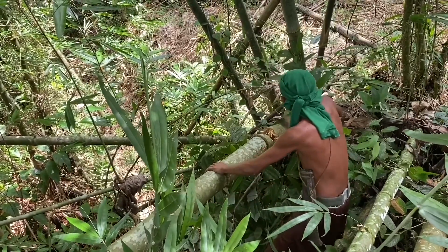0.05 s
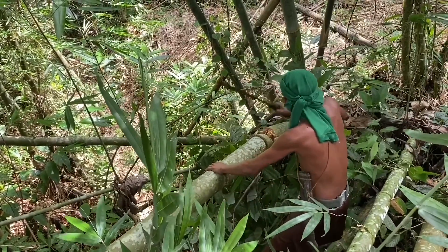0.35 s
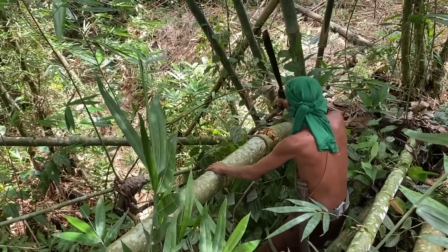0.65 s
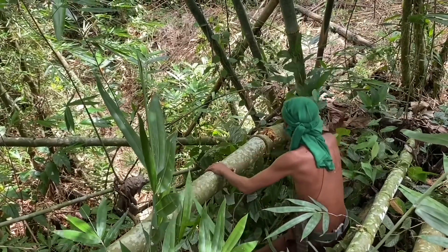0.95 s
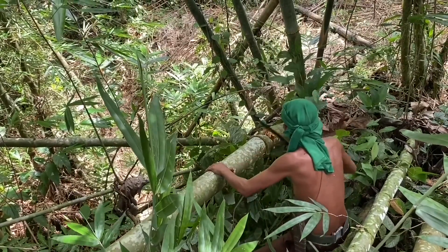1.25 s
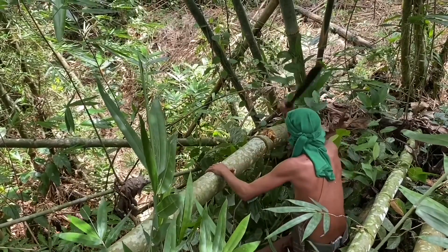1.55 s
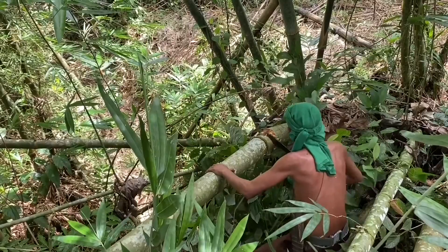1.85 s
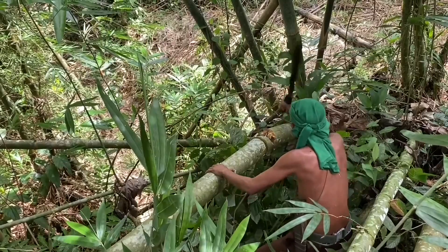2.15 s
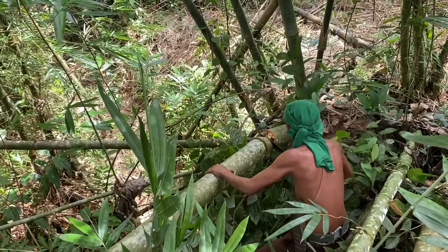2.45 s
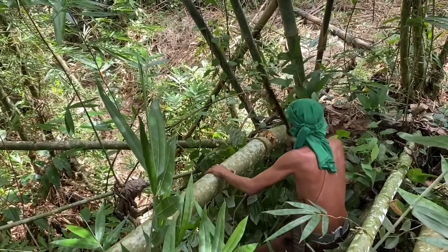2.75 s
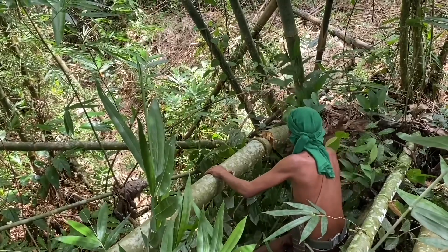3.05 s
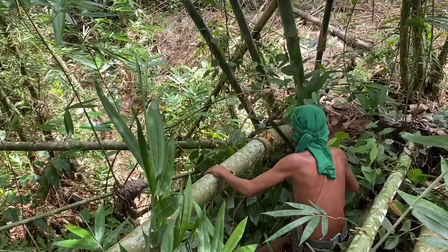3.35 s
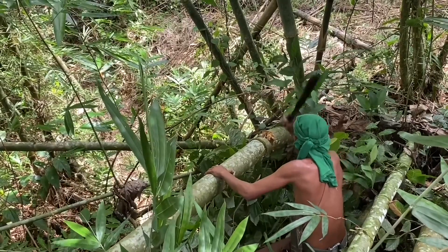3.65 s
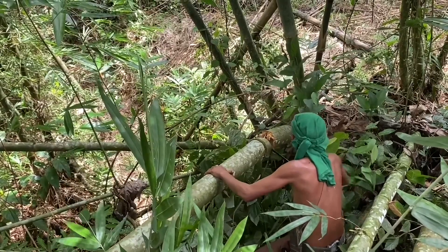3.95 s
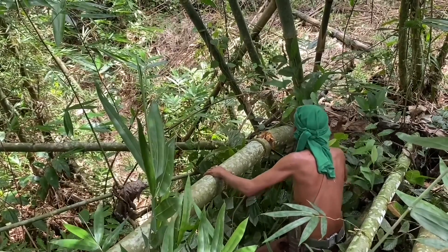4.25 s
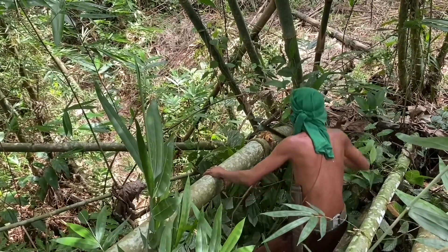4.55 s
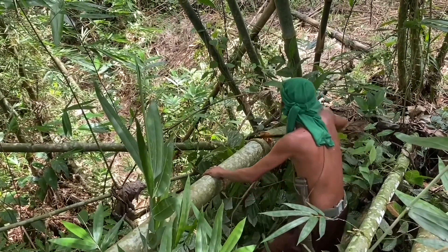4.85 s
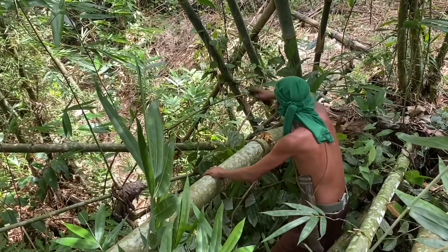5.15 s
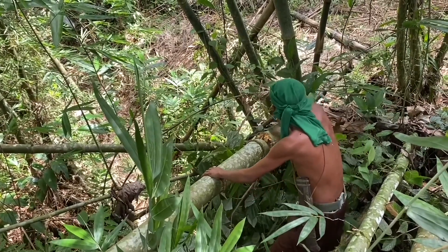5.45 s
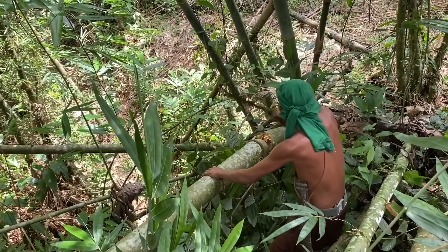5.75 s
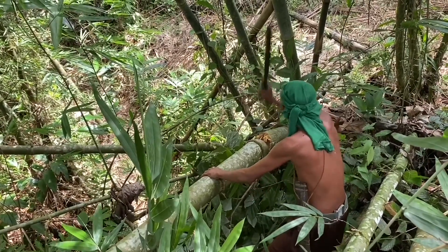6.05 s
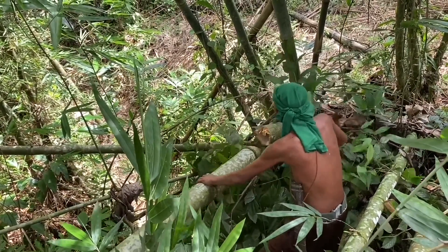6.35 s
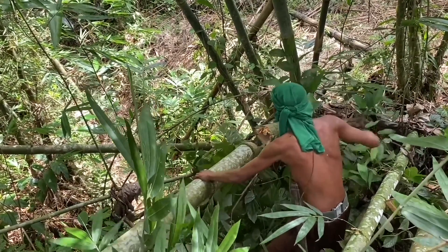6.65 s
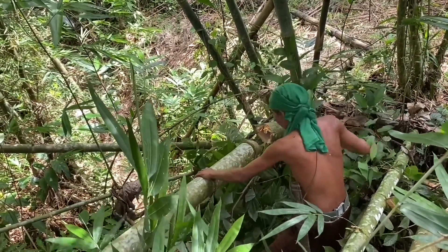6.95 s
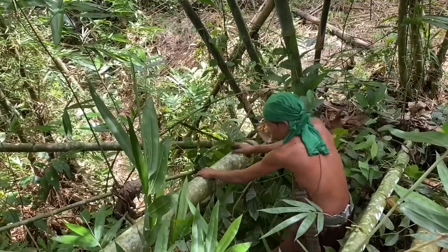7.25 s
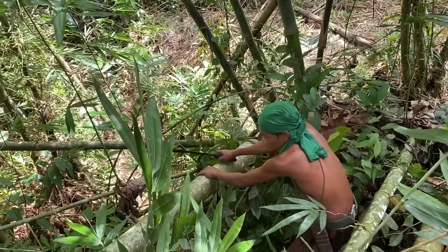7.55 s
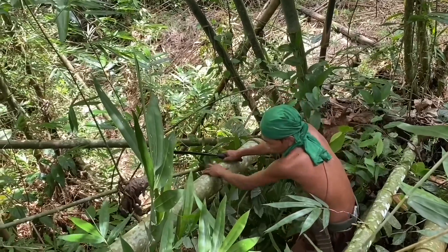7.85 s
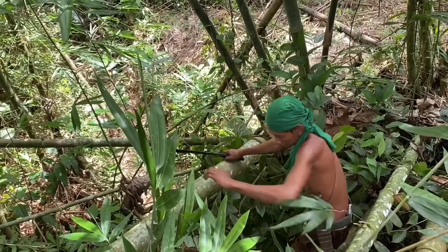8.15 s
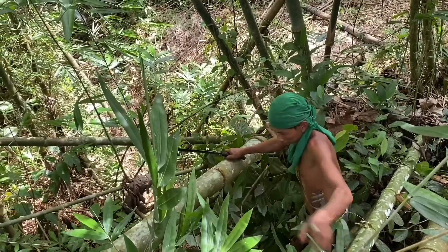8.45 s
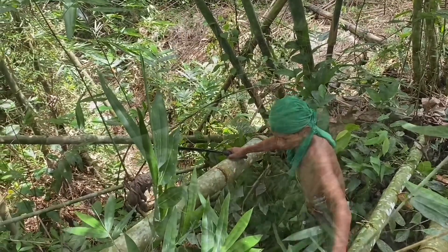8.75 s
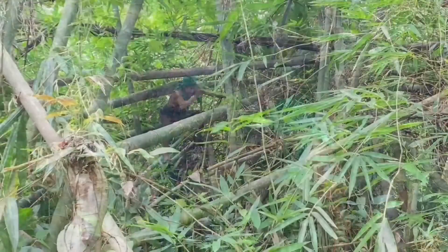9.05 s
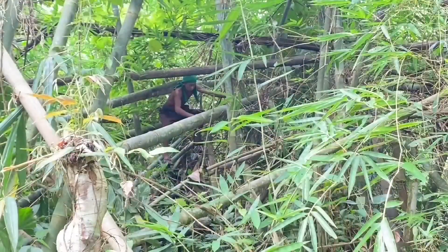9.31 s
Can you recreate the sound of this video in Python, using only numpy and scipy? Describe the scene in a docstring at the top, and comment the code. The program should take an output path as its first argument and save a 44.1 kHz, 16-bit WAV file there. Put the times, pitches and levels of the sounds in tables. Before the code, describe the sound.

Close to a stereo microphone in a bamboo grove, a machete chops a fallen pole about once a second. Each stroke is a crunchy, hollow knock with a slight steel ping. Chips tick into dry leaves, the wedged blade creaks midway, and one swing swishes through foliage. After a pause with faint bird calls, a final blow rings longer on another pole. Insects drone quietly over a low rumble.

```python
"""Chopping green bamboo in a grove

Close to the stereo microphone a machete bites a fallen culm about once a second; some seconds later a second,
longer-ringing one is struck. Fibres crunch, the hollow knocks, the steel pings, and the stems scatter each blow
into a short wash. Chips tick into the litter, the wedged blade creaks, one swing swishes through leaves.
Further off, insects drone and birds call over a low rumble."""
import sys
import numpy as np
from scipy import signal
from scipy.fft import rfft, irfft, next_fast_len
from scipy.io import wavfile
from scipy.ndimage import map_coordinates

SR = 44100
rng = np.random.default_rng(int(sys.argv[2]) if len(sys.argv) > 2 else 0)


def master(y):
    """Save y as 16-bit WAV."""
    cut = np.clip(np.atleast_2d(y).T, -1, 1)
    pcm = np.round(cut * 32767)  # scale
    wavfile.write(sys.argv[1], SR, pcm.astype(np.int16))


N = 418068

# reverberation among the stems: f/Hz, t60/s
GROVE_DECAY = [(100, 1), (300, 0.75), (900, 0.82), (2500, 0.11), (6000, 0.98), (14000, 0.38)]
# insect song: f/Hz, level/dB
INSECT_SPECTRUM = [(2800, -45), (3300, -17.5), (3700, -3.5), (4000, -4.5), (4300, -1), (4550, -10.5),
                   (4900, -18), (6300, -26.5), (7500, -18), (9000, -24.5), (15000, -35.5)]
# low rumble: f/Hz, level/dB
RUMBLE_SPECTRUM = [(20, -33.5), (45, -16), (80, -1.5), (140, 1.5), (200, -14), (320, -14.5), (600, -35.5),
                   (1200, -74.5)]
# its slow swell: t/s, level/dB
RUMBLE_SWELL = [(0, -78.5), (3, -75), (4.3, -69.5), (7.5, -73), (9.1, -73.5)]
# soft air and rustle: f/Hz, level/dB
AIR_SPECTRUM = [(150, -1.5), (400, -1), (900, -4), (2000, -5), (3500, -11), (9000, -20.5)]
# blade contacts: t/s, bite/s, thump/dB, shudder/dB, hollow/dB, knock/dB, crack/dB, sizzle/dB, steel/dB,
# hollow/Hz, knock/Hz, upper/Hz, ping/Hz
BLOWS = [(0.1107, 0.017, -36, -50.5, -32.5, -31.5, -36, -53, -46.5, 954, 1164, 1233, 10300),
         (1.0323, 0.017, -31, -48.5, -35, -35.5, -36.5, -42.5, -67, 408.7, 844, 1444, 4000),
         (1.661, .0088, -48.5, -59.5, -37.5, -34.5, -35, -51, -63.5, 610.8, 1140, 1800, 4000),
         (2.345, 0.0068, -49.5, -55.5, -39, -32.5, -37.5, -45, -52.5, 512.8, 1600, 1166, 5200),
         (3.043, 0.0084, -47.5, -55, -39.5, -37, -35, -38.5, -56.5, 763, 1404, 1694, 10300),
         (3.7565, 0.017, -48.5, -52.5, -34, -33, -37.5, -53, -64.5, 534.3, 1338, 1700, 4000),
         (4.872, 0.0024, -63.5, -70.5, -47, -47, -58, -68, -69, 884, 1056, 1170, 10300),
         (4.88, 0.0025, -57.5, -72.5, -49, -46, -61.5, -71.5, -70.5, 700, 1117, 1190, 10300),
         (5.472, 0.0044, -50, -68.5, -49, -33, -38, -57.5, -65.5, 800, 1936, 2765, 4000),
         (5.483, 0.013, -44.5, -55, -31.5, -38, -44.5, -58, -72, 670.5, 926, 1203, 4000),
         (6.165, 0.0062, -31, -54, -31.5, -33.5, -36.5, -53, -62.5, 640, 927, 1525, 4000),
         (9.179, 0.018, -54, -54.5, -40, -39, -41, -57, -79, 445, 1317, 2725, 2500)]
# hollow, knock, crack, splinter and sizzle ranges: low/Hz, high/Hz, left-right difference/ratio
WOOD_RANGES = [(320, 900, .3), (900, 2300, .55), (2300, 6000, .65), (6000, 11500, .85), (13000, 15600, .7)]
# snapping fibres: f/Hz, level/dB
FIBRE_SPECTRUM = [(120, -27.5), (200, 5.5), (353, -12.5), (647, -11.5), (851, -10), (1910, -10.5),
                  (2860, -20), (4200, -21.5), (5520, -25.5), (6400, -28), (8270, -30), (10300, -29.5),
                  (12200, -37), (14300, -14), (16000, -42)]
# culm wall: f/Hz, width/Hz, level/dB
WALL_MODES = [(642, 95, -3), (953, 45, -0.5), (1164, 77, -1), (1425, 15, -0.5), (1593, 35, -4),
              (1712, 22, -1), (1934, 71, -6.5), (2400, 7.2, -4), (3360, 47, -7.5), (3720, 60, -7),
              (3910, 66, -8), (4343, 50, -4), (4370, 44, -5)]
# steel blade: f/Hz, level/dB, t60/s
BLADE_MODES = [(2420, -9, .16), (4150, -5, .065), (5200, -3, .09), (9150, -9.5, 0.23), (10170, -1.5, .26),
               (10280, -2, .26), (14300, -7, .1)]
# the louder chips and twigs: t/s, level/dB, dull share/dB, bright share/dB, f/Hz
CHIP_FALLS = [(.284, -63, -15, -7.5, 2370), (.474, -73.5, -1.5, -22, 1940), (.872, -72, -24, -17, 2160),
              (1.376, -68.5, -7, 4, 2400), (1.467, -71, -0.5, -18, 2220), (1.538, -71.5, 1, -9, 793),
              (2.018, -70, 2, -16, 1170), (2.159, -66.5, -4.5, -13, 2030), (2.209, -71.5, -20.5, -6, 2030),
              (2.532, -59, -16, -14, 1063), (3.213, -63, -23, -30, 2057), (3.449, -78, -4.5, -20, 1030),
              (3.621, -70, -9.5, -7, 1370), (4.058, -67, -36, -15, 797), (6.276, -59.5, -25, -13, 2200),
              (6.529, -62, -14, -4.5, 3070), (6.856, -73.5, -20, -18, 2990), (6.971, -68, -28, -17, 1010),
              (7.016, -70, 2.5, -18, 1110), (7.275, -63.5, -7.5, -11.5, 1003),
              (7.505, -69, -4.5, -18, 1303), (7.74, -74, -18.5, -18, 2250),
              (8.229, -72.5, -27.5, -1.5, 3480)]
# the wedged blade slipping: t/s, hold/s, level/dB, slip rate/Hz
BLADE_SLIPS = [(4.186, 0.059, -32.5, 68), (4.357, 0.014, -37.5, 60)]
# wall around the cut: f/Hz, level/dB, t60/s
CUT_MODES = [(334, -4, 0.023), (615, 0, 0.042), (1150, -7, 0.0079), (1523, -2.5, 0.031), (1900, -6, 0.012)]
# the blade's swish through leaves, then the crackle after it: t/s, attack/s, hold/s, t60/s, level/dB
LEAF_BURSTS = [(6.122, .01, 0.043, 0.25, -46.5), (6.17, 0.024, 0.2, 2.02, -59)]
# colour of both: f/Hz, level/dB
LEAF_SPECTRUM = [(300, 1.5), (900, 5.5), (2500, 0.5), (6000, -2), (10000, -8), (15000, -8.5)]
# one held call, like a rooster's: t/s, f/Hz
CROW_MELODY = [(7.58, 938), (7.8, 867), (8.0, 924), (8.5, 821)]
# a small bird's rising chirps: t/s, top/Hz, level/dB
BIRD_CHIRPS = [(7.785, 6950, -70), (8.0, 6950, -69.5), (8.23, 7000, -72.5), (8.475, 6900, -73),
               (8.705, 6800, -76)]
# second culm: f/Hz, level/dB, t60/s
SECOND_CULM_MODES = [(355, -4.5, 0.43), (403, 4.5, 0.12), (460, 4.5, 0.12), (792, 8, 0.1), (958, -3, 0.2),
                     (1500, -17, 0.29), (1640, -11, 0.5), (2396, -17, 0.28), (2600, -16, 0.58),
                     (2750, -16, 0.17)]


def amp(db):
    return 10 ** (np.asarray(db) / 20)


def unit(x):
    return x / np.sqrt(np.mean(x ** 2) + 1e-20)


def along(points, hz):
    """Read (f/Hz, value) points on a log axis."""
    f, v = np.transpose(points)
    return np.interp(np.log(hz + 1), np.log(f + 1), v)


def curve(points):
    """Read (t/s, value) points at every sample."""
    return np.interp(np.arange(N) / SR, *np.transpose(points))


def wobble(rate):
    """A smooth random curve, rate knots a second."""
    return map_coordinates(rng.standard_normal(int(N * rate / SR) + 4), [np.arange(N) * rate / SR])


def filtered(x, response):
    """x through a complex frequency response."""
    n = x.shape[-1]
    m = next_fast_len(n + 8192)
    return irfft(rfft(x, m) * response(np.fft.rfftfreq(m, 1 / SR)), m)[..., :n]


def resonance(f, centre, width):
    """Causal response of one mode."""
    return 1j * f * width / (centre ** 2 - f ** 2 + 1j * f * width)


def wall(f, modes):
    """Response of a bamboo wall: modes of alternating sign."""
    return sum((-1) ** k * amp(db) * resonance(f, hz, width) for k, (hz, width, db) in enumerate(modes))


def band(x, lo, hi, order=2):
    return signal.lfilter(*signal.butter(order, [lo, hi], "band", fs=SR), x)


def fade(t, t60):
    return np.exp(-np.log(1000) * t / t60)


def envelope(s, attack, hold, t60):
    """A linear rise from time s, a hold and an exponential release."""
    t = np.arange(N) / SR - s
    return np.clip(t / attack, 0, 1) * fade(np.clip(t - attack - hold, 0, 3 * t60), t60)


def struck(x, db):
    """Scale x so that its first 40 ms have the given rms level."""
    return amp(db) * x / np.sqrt(np.mean(x[:SR // 25] ** 2) + 1e-20)


def ring(modes, t, scatter_db):
    """Free decay of modes, each at a slightly new strength."""
    return sum(amp(db + scatter_db * rng.standard_normal()) * fade(t, t60) * np.sin(2 * np.pi * hz * t)
               for hz, db, t60 in modes)


def add(track, s, x):
    """Mix x into the track from time s."""
    i = round(s * SR)
    track[..., i:i + x.shape[-1]] += x[..., :N - i]


def spread(pair, width):
    """Left and right from a mid-side pair."""
    return np.array([pair[0] + width * pair[1], pair[0] - width * pair[1]]) / np.hypot(1, width)


def rush(spectrum, width):
    """Stereo noise of rms 1."""
    return spread(unit(filtered(rng.standard_normal((2, N)), lambda f: amp(along(spectrum, f)))), width)


def grove(x, near_t60, near_db, width):
    """Close stems scatter a quick wash, the far ones a faint long tail."""
    hz, t, noise = signal.stft(rng.standard_normal((2, 3 * SR // 4)), SR, nperseg=256)
    decay = fade(t, along(GROVE_DECAY, hz)[:, None]) + amp(near_db) * fade(t, near_t60)
    tail = signal.istft(noise * decay * (1 - np.exp(-t / .012)), SR, nperseg=256)[1]
    return signal.fftconvolve(x[None], spread(tail, width) / np.linalg.norm(tail[0]), axes=1)


def insects(t, start_db=-64, wane_db_per_s=.3141):
    """A narrow band of song all round the microphone, slowly waning."""
    return amp(start_db - wane_db_per_s * t + .66 * wobble(25)) * rush(INSECT_SPECTRUM, width=1.5)


def rumble():
    """A low, unevenly swelling rumble near the centre."""
    return amp(curve(RUMBLE_SWELL) + 1.5 * wobble(6)) * rush(RUMBLE_SPECTRUM, width=.17)


def leaf_stir(t60=3.1):
    """Strength of the rustle: leaves settle at the start, after each blow and as the pole is handled."""
    shakes = [amp(crack_db - 31.5) * envelope(s, attack=.048, hold=0, t60=t60)
              for s, crack_db in np.array(BLOWS)[:, [0, 6]]]
    handling = amp(-76) * envelope(6.35, attack=.15, hold=.45, t60=5.1)
    settling = amp(-79.5) * fade(np.arange(N) / SR, t60)
    return np.linalg.norm(shakes + [handling, settling], axis=0)


def rustle(stir, air_db=-85, grain_db=2.5):
    """Stirred leaves add a grainy hiss to the still air."""
    grain = unit(amp(grain_db * wobble(140)))
    return np.hypot(amp(air_db), stir * grain) * rush(AIR_SPECTRUM, width=.27)


def ambience(stir, duck_s=3.24, duck_length_s=.412):
    """The background; the recorder briefly turns it down, most in the insects' high band."""
    t = np.arange(N) / SR
    duck_db = -11.5 * np.clip(np.minimum(t - duck_s, duck_s + duck_length_s - t) / .046, 0, 1)
    bed = amp(duck_db) * insects(t) + amp(.38 * duck_db) * (rumble() + rustle(stir))
    return bed * amp([[-1.3], [1.3]])  # louder on the right


def fibre_snaps(t, bite):
    """Fibres snap in a dense run while the edge sinks in, heard through the culm wall."""
    force = (1 - np.exp(-t / .0004)) / (1 + (t / bite) ** 6) + amp(-16) * fade(t, .09)
    run = force * rng.standard_normal(len(t)) * amp(.81 * rng.standard_normal(len(t)))
    return filtered(run, lambda f: amp(along(FIBRE_SPECTRUM, f)) * (.6 + amp(-1.5) * wall(f, WALL_MODES)))


def voiced(x, levels):
    """Split x into the wood's five ranges, each at its level for this blow."""
    return np.array([struck(band(x, lo, hi, order=3), db) for (lo, hi, _), db in zip(WOOD_RANGES, levels)])


def wall_knock(t, hz, bite, t60):
    """A wall mode builds up during the bite and is quickly damped by the wet wood."""
    drift = np.cumsum(rng.standard_normal(len(t))) * .032
    return (1 - np.exp(-2 * t / bite)) * fade(t, t60) * np.sin(2 * np.pi * hz * t + drift)


def blade_ping(t, ping_hz, octaves=.43):
    """The spot struck on the edge favours the steel's modes near ping_hz."""
    modes = [(hz, db - 6 * (np.log2(hz / ping_hz) / octaves) ** 2, t60) for hz, db, t60 in BLADE_MODES]
    return ring(modes, t, scatter_db=2.5)


def pole_shudder(t):
    """The pole shakes on the ground."""
    ground = band(band(rng.standard_normal(len(t)), 63, 175), 40, 320)
    return ground * (1 - np.exp(-t / .0042)) * fade(t, t60=.4)


def chamber_thump(t, rest_hz=182.5, swell_s=.0052):
    """Air in the culm swells and dies within a few cycles, sagging in pitch as the blade stops."""
    phase = 2 * np.pi * np.cumsum(rest_hz * (1 + .5 * np.exp(-t / .0105))) / SR
    overtone = amp(-5) * fade(t, .09) * np.sin(2 * phase)
    return (t / swell_s) ** 2 * np.exp(-t / swell_s) * (np.sin(phase) + overtone)


def chops(crack_hz=3800, splinter_db=-9.5):
    """Each blow, close up: fibres, wall, blade, pole and chamber, then the wash from the stems."""
    out, t = np.zeros((2, N)), np.arange(SR // 3) / SR
    widths, early = np.array(WOOD_RANGES)[:, 2], t[:SR // 8]
    for (s, bite, thump_db, shudder_db, hollow_db, knock_db, crack_db, sizzle_db, steel_db,
         hollow_hz, knock_hz, upper_hz, ping_hz) in BLOWS:
        levels = [hollow_db, knock_db, crack_db, crack_db + splinter_db, sizzle_db]
        # the spot struck decides which wall modes speak
        spot = lambda f: (1 + resonance(f, hollow_hz, 130) + amp(.5) * resonance(f, knock_hz, 220)
                          + amp(2.5) * resonance(f, upper_hz, 270)
                          + amp(9.5) * resonance(f, crack_hz, 550))
        crunch = voiced(filtered(fibre_snaps(t, bite), spot), levels).sum(axis=0)
        knocks = struck(wall_knock(t, hollow_hz, bite, t60=.048), hollow_db - 4.5)
        knocks += struck(wall_knock(t, knock_hz, bite, t60=.031), knock_db - 3)
        knocks += struck(wall_knock(t, upper_hz, bite, t60=.046), knock_db - 8.5)
        ping = struck(blade_ping(t, ping_hz), steel_db)
        shudder = struck(pole_shudder(t), shudder_db)
        thump = struck(chamber_thump(t), thump_db)
        mid = crunch + knocks + ping + thump + shudder
        # the nearest stems reflect differently to each side, most of all in the treble
        side = widths @ voiced(fibre_snaps(t, bite), levels)
        add(out, s, np.array([mid + side, mid - side]))
        # thin stems throw back little of the hollow note; each direction gets its own crack
        body = (amp(-7.5) * thump + amp(-11.5) * knocks)[:len(early)]
        wash_db = -1.5 if s == BLOWS[-1][0] else -9.5  # more from the second culm
        for direction in range(2):
            crack = amp([-1, -1.5, -.7, 4.5, 1.5]) @ voiced(fibre_snaps(early, bite), levels)
            add(out, s, amp(wash_db) * grove(crack + body, near_t60=.1, near_db=24.5, width=.7))
    return out


def tick(db, dull_db, bright_db, hz):
    """A dry tap: one short resonance, a dull knock and a bright edge."""
    t = np.arange(SR // 16) / SR
    touch = rng.standard_normal(len(t)) * fade(t, .042) * (1 - np.exp(-t / .0004))
    body = filtered(band(touch, 700, 4200), lambda f: .35 + resonance(f, hz, 300))
    dull = struck(band(touch, 190, 1200), db + dull_db)
    edge = struck(band(touch, 6100, 16000), db + bright_db)
    return struck(body, db) + dull + edge


def chips(stir, strays_per_s=10):
    """Chips and twigs land in the litter; faint stray ticks are louder while the leaves are astir."""
    out = np.zeros(N)
    for s, *tap in CHIP_FALLS:
        add(out, s, tick(*tap))
    count = int(strays_per_s * N / SR)
    stir_db = 20 * np.log10(stir / stir.mean() + 1e-3)
    for i, (size, colour, pitch) in zip(rng.integers(N, size=count), rng.standard_normal((count, 3))):
        db = -78 + 1.5 * size + .85 * stir_db[i]
        stray = tick(db, dull_db=-11 - 4 * colour, bright_db=-14 + 4 * colour, hz=1720 * np.exp(.35 * pitch))
        add(out, i / SR, stray)
    return out


def blade_creak():
    """Levered out, the wedged blade sticks and slips unevenly; every slip rings the wall."""
    slips = np.zeros(N)
    pace = np.cumsum(1 + .22 * wobble(60)) / SR
    for s, hold, db, rate in BLADE_SLIPS:
        pulses = np.diff(np.floor(rate * pace), prepend=0)
        slips += pulses * amp(db) * envelope(s, attack=.011, hold=hold, t60=.11)
    slip_decay = fade(np.arange(SR // 30) / SR, t60=.052)
    rub = signal.fftconvolve(slips * amp(1.2 * wobble(70)), slip_decay)[:N] * rng.standard_normal(N)
    modes = [(hz, np.log(1000) / np.pi / t60, db) for hz, db, t60 in CUT_MODES]
    return band(filtered(rub, lambda f: wall(f, modes)), 190, 2300, order=4)


def swish_and_crackle():
    """The blade swishes through leaves just before one blow, then leaves and fibres crackle."""
    bursts = sum(amp(db) * envelope(s, attack, hold, t60) for s, attack, hold, t60, db in LEAF_BURSTS)
    return bursts * unit(rush(LEAF_SPECTRUM, width=.85) * amp(2.7 * wobble(350) + 1.1 * wobble(24)))


def far_birds():
    """Rising chirps and one held crow reach the microphone only as scatter from the stems."""
    song, t = np.zeros(N), np.arange(SR // 10) / SR
    for s, top_hz, db in BIRD_CHIRPS:
        hz = top_hz * (1 - .26 * np.exp(-t / .061) - .04 * np.sin(np.pi * 110 * t) ** 2)
        phase = np.cumsum(2 * np.pi * hz / SR + .22 * rng.standard_normal(len(t)))
        add(song, s, amp(db) * np.hanning(len(t)) ** .5 * np.sin(phase))
    phase = 2 * np.pi * np.cumsum(curve(CROW_MELODY) * (1 + .02 * wobble(60))) / SR
    crow = np.sin(phase) + amp(-1.5) * np.sin(2 * phase)
    song += amp(-85.5) * envelope(CROW_MELODY[0][0], attack=.059, hold=.5, t60=1.5) * crow
    return grove(song, near_t60=.25, near_db=12, width=.7)[:, :N]


def second_culm():
    """A free-hanging culm rings on after the last blow; the stems smear its upper modes."""
    out, t = np.zeros((2, N)), np.arange(SR // 2) / SR
    note = struck(ring(SECOND_CULM_MODES, t, scatter_db=1) * (1 - np.exp(-t / .004)), db=-33.5)
    blur = unit(band(rng.standard_normal(len(t)), 5, 130, order=1))
    upper = band(band(note, 570, 4600) * blur, 460, 5340)
    add(out, BLOWS[-1][0], band(note, 236, 706) + amp(2) * upper)
    return out


def off_centre(f, lead_s=4.5e-5):
    """The work is a little off axis: the left side hears it first, the right has more bass."""
    tilt = amp(along([(200, -2.8), (700, -.14), (2000, -.4), (5000, .3)], f))
    left = tilt * np.exp(1j * np.pi * f * lead_s / (1 + (f / 5000) ** 2))
    return np.array([left, 1 / left])


def scene():
    """The work in the foreground, with leaves, birds and insects behind."""
    stir = leaf_stir()
    small = chips(stir) + blade_creak()
    work = chops() + second_culm() + small
    work += amp(-4) * grove(small, near_t60=.05, near_db=18.5, width=.94)[:, :N]
    return filtered(work, off_centre) + swish_and_crackle() + far_birds() + ambience(stir)


def record(dry, ceiling=.22, top_hz=15700):
    """The microphone ports notch the treble twice; peaks are rounded off and the very top is cut."""
    ports = lambda f: amp(-7 * np.exp(-((f - 8400) / 450) ** 2) - 15 * np.exp(-((f - 12300) / 500) ** 2))
    notched = filtered(dry, ports)
    rounded = notched / (1 + np.abs(notched / ceiling) ** 6) ** (1 / 6)
    return filtered(rounded, lambda f: 1 / (1 + (f / top_hz) ** 160))


dry = scene()
out = record(dry)
master(out)
```